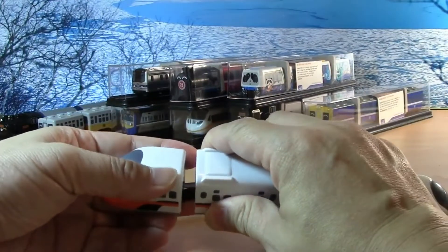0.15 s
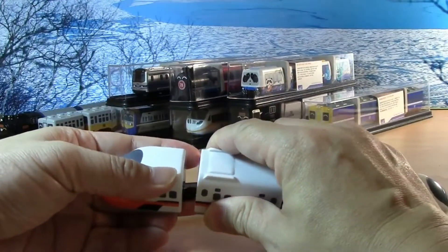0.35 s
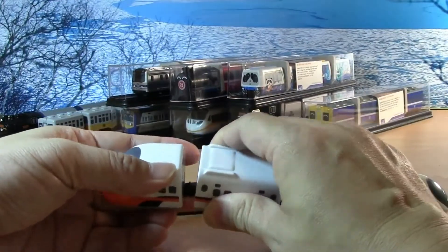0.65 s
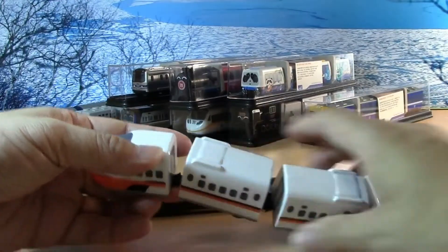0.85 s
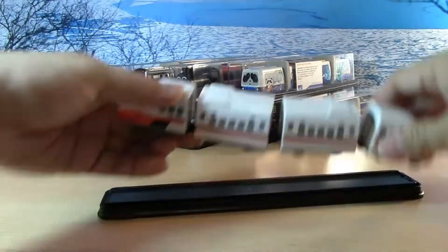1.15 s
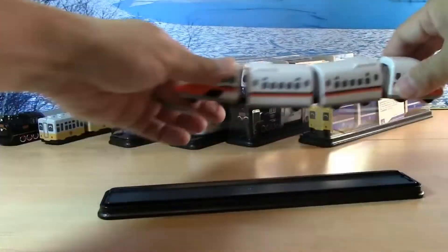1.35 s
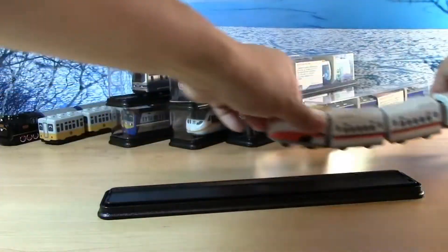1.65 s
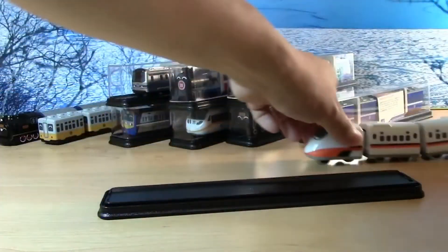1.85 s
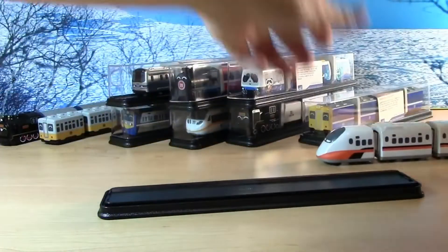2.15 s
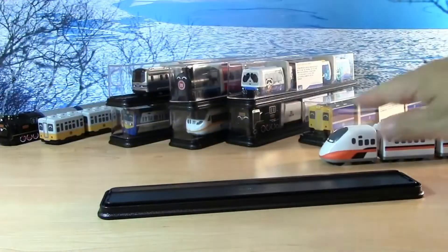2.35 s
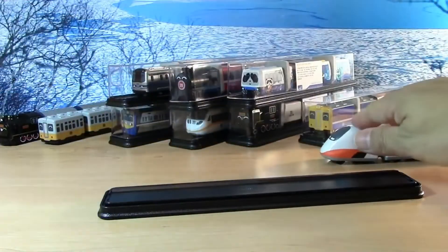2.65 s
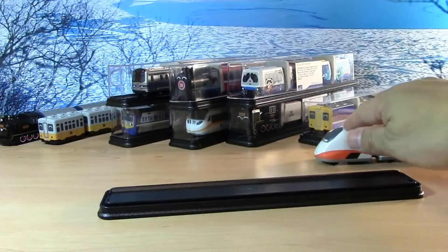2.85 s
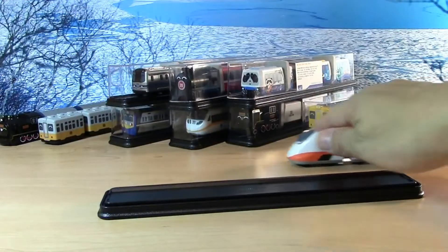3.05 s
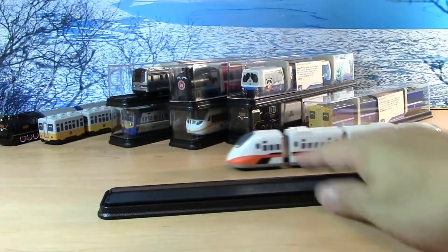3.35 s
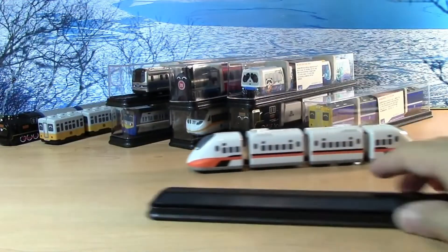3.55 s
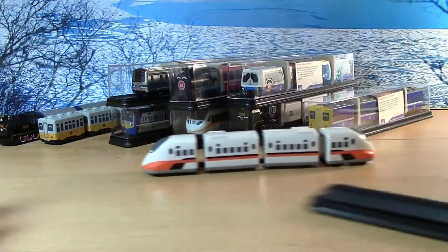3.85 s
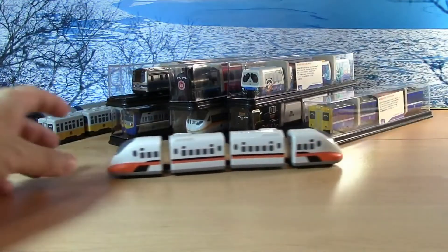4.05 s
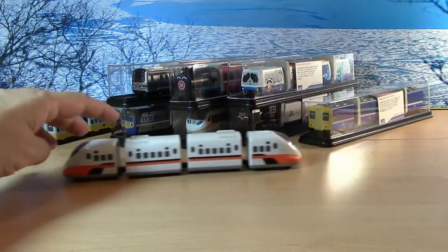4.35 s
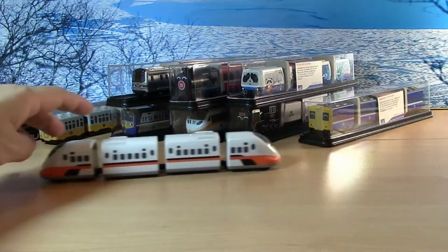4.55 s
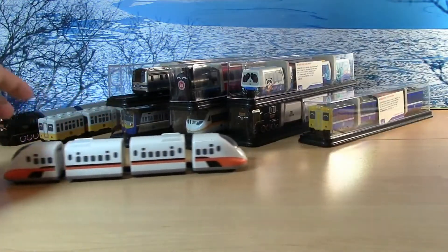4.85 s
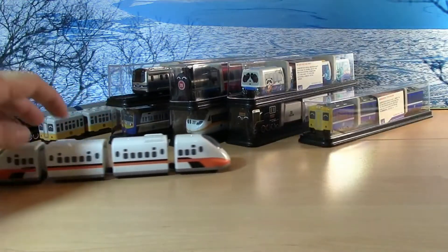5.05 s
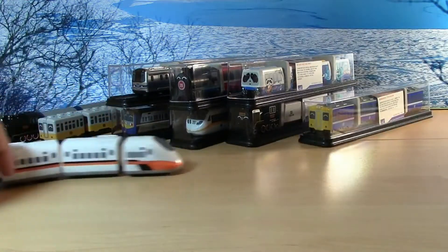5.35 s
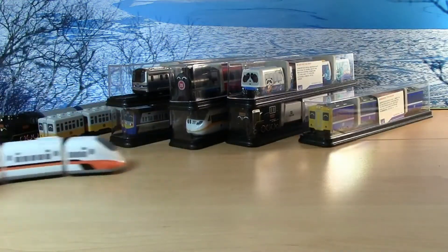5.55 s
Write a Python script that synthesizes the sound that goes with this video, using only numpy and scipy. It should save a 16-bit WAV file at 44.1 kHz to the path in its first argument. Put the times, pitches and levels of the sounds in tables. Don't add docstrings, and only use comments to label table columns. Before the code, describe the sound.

A wind-up toy's slipping gears rattle fast and sharp through a hollow plastic shell for about two seconds. The rattle gives way to wheels and a plastic tray rubbing and knocking on a wooden tabletop, loudest near three seconds. Irregular clacks and short scrapes thin out, ending in a soft rub and room hush. Dry, near microphones, narrow stereo.

```python
import sys
import numpy as np
from scipy import signal
from scipy.io import wavfile
from scipy.ndimage import uniform_filter1d, map_coordinates

SR = 44100
rng = np.random.default_rng(int(sys.argv[2]) if len(sys.argv) > 2 else 0)


def transcribe(u):
    v = np.clip(np.atleast_2d(u).T, -1, 1)
    q = np.round(v * 32767).astype(np.int16)
    wavfile.write(sys.argv[1], SR, q)


def voltage_ratio(decibels):
    exponent = np.asarray(decibels, float) / 20
    return 10 ** exponent


N = 250929


def evened(x):
    return x / np.sqrt(np.mean(x ** 2) + 1e-20)


def read(points, hz):
    f, value = np.transpose(points)
    return np.interp(np.log(hz + 1), np.log(f + 1), value)


def level_curve(points):
    s, db = np.transpose(points)
    return np.interp(np.arange(N) / SR, s, db, left=-120, right=-120)


def causal(db):
    mirrored_db = np.r_[db, db[-2:0:-1]]
    log_gain = np.log(voltage_ratio(np.maximum(mirrored_db, -100)))
    spectrum = np.exp(np.conj(signal.hilbert(log_gain)))
    return np.fft.ifft(spectrum).real[:len(db) - 1]


def hertz():
    return np.linspace(0, SR / 2, 2049)


def peaks(modes, hz):
    f, width, _ = np.transpose(modes)[:, :, None]
    return 1 / (1 + (2 * (hz - f) / width) ** 2)


def summed_db(modes, steep):
    mode_power = voltage_ratio(2 * np.transpose(modes)[2])[:, None]
    power = (mode_power * peaks(modes, hertz()) ** steep).sum(0)
    bass_loss = 1 + (380 / (hertz() + 1)) ** 4
    return 10 * np.log10(power / bass_loss + 1e-9)


def ticks(per_s, spread_db):
    size_db = spread_db * np.minimum(rng.exponential(1, N), 3.6)
    size = voltage_ratio(size_db) * rng.choice([-1., 1.], N)
    return size * (rng.random(N) < per_s / SR)


def lumps(hz, depth_db):
    smooth = signal.lfilter(*signal.butter(2, hz / SR * 2), rng.standard_normal(N))
    return evened(voltage_ratio(depth_db * evened(smooth)))


def rub(level_db, colour_db, per_s, spread_db, lump_hz, lump_db):
    drive = ticks(per_s, spread_db) * lumps(lump_hz, lump_db)
    return voltage_ratio(level_db) * evened(signal.oaconvolve(drive, causal(colour_db))[:N])


def add(mix, s, sound):
    part = mix[round(s * SR):][:len(sound)]
    part += sound[:len(part)]


def strike(out, s, db, t60, rise_s, colour_db, noise):
    t = np.arange(len(noise)) / SR
    decay = voltage_ratio(-60 * t / max(t60, .003))
    burst = noise * abs(noise) * decay * np.minimum(t / rise_s, 1)
    sound = signal.fftconvolve(burst, causal(colour_db))
    add(out, s, voltage_ratio(db) * sound / abs(sound).max())


def wander(x, depth_db, wide_hz, long_s, climb_hz):
    hz, t, z = signal.stft(x, SR, nperseg=512, noverlap=384)
    field = rng.standard_normal((2 * len(hz), len(t)))
    for _ in range(2):
        field = uniform_filter1d(field, max(round(wide_hz / hz[1]), 1), axis=0)
        field = uniform_filter1d(field, max(round(long_s / t[1]), 1), axis=1)
    row = (np.arange(len(hz))[:, None] - climb_hz * t / hz[1]) % (len(field) - 1)
    patches = map_coordinates(evened(field), [row, np.arange(len(t)) + 0 * row], order=1)
    gain_db = depth_db * (patches - uniform_filter1d(patches, 24, axis=0))
    return signal.istft(z * voltage_ratio(gain_db), SR, nperseg=512, noverlap=384)[1][:N]


# time in seconds, rattle level in dB.
GEAR_LEVEL = [(0.0, -31), (0.122, -35.5), (0.2, -75), (0.262, -94), (0.36, -51), (0.42, -28.5),
              (0.5, -22.5), (0.9, -21.5), (1.88, -27), (2.092, -27.5), (2.378, -25.5), (2.4, -32)]
# frequency in Hz, level in dB.
GEAR_COLOUR = [(290, -44.5), (500, -20), (761, 0), (1160, -1), (1300, 5), (1870, -6), (2730, 2),
               (4090, -6.5), (5240, -4), (9490, -19.5), (16000, -38.5)]
# frequency in Hz, width in Hz, lift in dB.
SHELL_MODES = [(743, 120, 2.5), (1240, 670, -0.5), (1330, 320, 1.5), (2660, 250, 0.2), (3100, 1350, 4.5),
               (4590, 200, 9), (5050, 100, 4.5), (5320, 420, 5), (6210, 98, 9), (6840, 170, 9),
               (7610, 620, 10.5), (9340, 780, 10), (11300, 550, 6)]
# frequency in Hz, level in dB.
HUM_COLOUR = [(35, -35), (60, -34), (102, -20.5), (156, -17), (270, -1), (432, 2), (472, 0.5), (650, 2.5),
              (840, 0.5), (1430, -120)]
# time in seconds, level in dB.
TOOTH_SLIPS = [(0.4155, -17), (0.4479, -4.5), (0.5244, -18), (0.5434, -24), (0.5874, -14), (0.5972, -13),
               (0.663, -7), (0.6867, -8), (0.6914, -0.5), (0.717, -6), (0.7802, -7.5), (0.8047, -11),
               (0.8158, -2), (0.9118, -2.5), (0.9298, -9), (0.9418, 0), (0.9544, -4), (0.9634, -1),
               (0.9952, -4.5), (1.0231, -8.5), (1.073, -9), (1.13, -8), (1.2212, -27), (1.2494, -11),
               (1.3836, -7), (1.4316, -4.5), (1.4644, -14), (1.5714, -4.5), (1.7095, -10), (1.7714, -9),
               (1.8937, -11), (1.914, -8), (1.9538, -10)]


def gears(spot_count=8):
    t = np.arange(N) / SR
    level_db = level_curve(GEAR_LEVEL)
    variation_db = 1.83 * rng.standard_normal((spot_count, len(SHELL_MODES)))
    lifts_db = np.transpose(SHELL_MODES)[2] + variation_db
    shell_shapes = peaks(SHELL_MODES, hertz())
    spots = [causal(read(GEAR_COLOUR, hertz()) + db @ shell_shapes) for db in lifts_db]
    impacts = sum(signal.oaconvolve(ticks(750, 2.8), spot)[:N] for spot in spots)
    rattle = evened(impacts * lumps(93, 1.76))

    turns_per_s, slowing, wobble_depth_db = 8.05, 1.977, 0.5
    since = np.clip(t - 0.685, -1, 1.5)
    wobble_db = wobble_depth_db * np.cos(2 * np.pi * (turns_per_s - slowing * since) * since)
    out = voltage_ratio(level_db + 0.38 + wobble_db) * rattle

    slip_decay = voltage_ratio(-60 * np.arange(400) / SR / 0.016)
    spot_index = rng.integers(0, spot_count, len(TOOTH_SLIPS))
    chatter = rng.standard_normal((len(TOOTH_SLIPS), 400))
    for (s, db), k, noise in zip(TOOTH_SLIPS, spot_index, chatter):
        slip = np.convolve(noise * abs(noise) * slip_decay, spots[k])
        add(out, s, voltage_ratio(db - 4.0) * slip / abs(slip).max())
    return wander(out, 2.22, 300, 0.029, 112) + chassis_hum(level_db)


def chassis_hum(gear_db):
    set_down_s, damp_db_per_s = 2.19, 28
    on_table_s = np.maximum(np.arange(N) / SR - set_down_s, 0)
    hum_db = -28.5 + 0.36 * gear_db - damp_db_per_s * on_table_s
    return rub(hum_db, read(HUM_COLOUR, hertz()), 3000, 0.93, 28, 0.59)


# start in seconds, end in seconds,
# first level in dB, last level in dB, plastic rasp in dB relative to the stroke.
STROKES = [(1.978, 2.62, -21.5, -36, -12), (2.233, 2.65, -43.5, -36, 16), (2.66, 2.782, -34, -37, 12.5),
           (2.686, 2.834, -26.5, -22, -4), (2.837, 2.969, -16.5, -29, -5),
           (2.991, 3.14, -20.5, -22.5, -2.5), (3.23, 3.233, -15, -20.5, -3), (3.306, 3.5, -41.5, -43, -4),
           (3.52, 3.587, -32.5, -29.5, -4), (3.629, 3.796, -29, -61, 1.5), (3.833, 3.894, -39, -43, -8),
           (3.933, 4.053, -34.5, -21, -10.5), (4.14, 4.232, -27.5, -32, -11),
           (4.276, 4.389, -25.5, -23, -7), (4.41, 4.553, -22.5, -29.5, -6.5), (4.557, 4.735, -30, -48, -7),
           (4.753, 4.894, -47.5, -49, -1)]


def pressure():
    attack_db_per_s, release_db_per_s = 500, 249
    t, power = np.arange(N) / SR, np.zeros((3, N))
    for start, end, first_db, last_db, rasp_db in STROKES:
        db = np.interp(t, [start, end], [first_db, last_db])
        db = db - attack_db_per_s * np.maximum(start - t, 0)
        db = db - release_db_per_s * np.maximum(t - end, 0)
        hiss_db = -4.5 + (1 + 0.16) * rasp_db
        power += voltage_ratio(2 * (db + np.array([[0], [rasp_db], [hiss_db]])))
    return 10 * np.log10(power + 1e-12)


# frequency in Hz, width in Hz, level in dB.
TABLE_MODES = [(630, 35, -10), (769, 106, -3.5), (952, 347, -3.5), (1177, 200, -1.5), (1330, 330, -4.5),
               (1527, 400, -3.5), (1810, 140, -13.5)]
# frequency in Hz, width in Hz, level in dB.
CAR_MODES = [(2210, 850, -6.5), (2800, 180, -3.5), (3130, 890, -7), (3520, 400, -4), (4200, 570, -16.5)]
# frequency in Hz, level in dB.
HISS_COLOUR = [(2350, -40), (3300, -3), (4000, 1.5), (5070, 16.5), (6700, 10), (8210, 8.5), (8550, 6.5),
               (10100, 1), (15500, -18.5), (16000, -70)]


def drag():
    table_db, car_db, hiss_db = pressure()
    drone = rub(table_db - 4.0, summed_db(TABLE_MODES, 1.43), 1600, 0.25, 73, 1.06)
    rasp = rub(car_db - 4.5, summed_db(CAR_MODES, 1.52), 2500, 1.1, 44, 0.23)
    hiss = rub(hiss_db - 4.0, read(HISS_COLOUR, hertz()), 9000, 0.82, 99, 2.5)
    return wander(drone, 1.5, 200, .04, 0) + wander(rasp + hiss, 2.2, 400, .04, 300)


# start in seconds,
# end in seconds, first frequency in Hz, last frequency in Hz, level in dB.
SWEEPS = [(2.2, 2.34, 9150, 9300, -36), (2.36, 2.5, 9500, 7200, -36), (2.44, 2.8, 9700, 10400, -38),
          (2.19, 2.53, 1800, 7000, -42), (2.3, 2.46, 6800, 14000, -40), (2.4, 2.56, 5900, 6600, -29),
          (2.5, 2.76, 6900, 7500, -33), (2.48, 2.76, 8700, 7400, -47), (2.28, 2.41, 3400, 3400, -44),
          (2.43, 2.62, 2600, 5100, -37), (2.58, 2.78, 3300, 3150, -27.5), (2.44, 2.64, 2600, 2200, -32.5),
          (2.55, 2.78, 1800, 3100, -29.5), (2.22, 2.36, 1300, 2200, -30.5), (2.43, 2.78, 1480, 1500, -34.5),
          (2.58, 2.78, 4400, 6900, -46), (2.84, 2.9, 2600, 3500, -25), (3.02, 3.1, 4300, 6900, -28),
          (3.0, 3.17, 4600, 1900, -30), (3.085, 3.125, 3500, 2300, -33), (0.28, 0.69, 3100, 1600, -44.5),
          (2.33, 2.39, 1850, 1600, -23.5), (2.56, 2.8, 2500, 2600, -31.5), (2.04, 2.13, 1800, 2400, -31.5),
          (3.63, 3.78, 2780, 2850, -42)]


def sweeps():
    out = np.zeros(N)
    noises = rng.standard_normal((len(SWEEPS), 2, 20000))
    for (start, end, first_hz, last_hz, db), (a, b) in zip(SWEEPS, noises):
        size = round((end - start) * SR)
        width_hz = .11 * first_hz
        slow = signal.lfilter(*signal.butter(2, width_hz / SR), a + 1j * b)[1000:1000 + size]
        turns = np.cumsum(np.linspace(first_hz, last_hz, size)) / SR
        tone = (slow * np.exp(2j * np.pi * turns)).real
        add(out, start, voltage_ratio(db) * evened(tone) * signal.windows.tukey(size, .6))
    return out * lumps(75, 1.3)


# time in seconds, level in dB, body ring in dB relative
# to the crack, body ring in Hz, top treble in dB relative to the crack.
KNOCKS = [(2.0018, -27, 17, 2620, -24), (2.0384, -26, 11.5, 2310, -20), (2.0986, -15.5, 1, 2900, -22),
          (2.12, -18, 8, 3000, -30), (2.338, -22, 9, 2700, -33), (2.355, -22, 9, 1870, -30),
          (2.1735, -14, -13, 2870, -31), (2.816, 2, -6, 2930, -14), (3.0165, -6.5, 2, 2800, -25),
          (3.1033, -10, -7, 2830, -30), (3.1333, -15, -3, 3460, -36), (3.2206, -3, -2, 2300, -34),
          (3.2374, -11, 1, 2600, -27), (3.5104, -9.5, 0, 3340, -27), (3.5778, -8.5, 0, 2830, -23),
          (3.5924, -10, -5, 2740, -24), (3.6152, -13, 2, 2620, -8), (3.8237, -32.5, 6, 2250, -24),
          (3.932, -13.5, -2.5, 3570, -43), (4.0337, -15, 3.5, 3080, -22), (4.146, -18, 8.5, 2150, -24),
          (4.5261, -8, -3, 2800, -32), (4.5304, -10.5, 3.5, 3100, -32), (4.8065, -42, 17.5, 2380, -20),
          (4.8304, -41, 8, 2300, -23)]
# time in seconds, level in dB.
MORE_KNOCKS = [(3.1975, -20), (3.2914, -35), (3.5248, -19.5), (3.726, -33.5), (3.758, -36), (3.77, -34),
               (3.848, -25.5), (3.9524, -22), (3.967, -24), (4.008, -32), (4.0242, -19.5), (4.0408, -23),
               (4.078, -24), (4.139, -19), (4.1605, -23), (4.1809, -37), (4.19, -31), (4.226, -31), (4.502, -29),
               (4.549, -20), (4.748, -31), (4.7592, -32), (5.4321, -50), (5.5567, -39.5), (5.5804, -35.5),
               (5.6456, -46)]


def knocks():
    t60 = 0.025
    shared_ring_db, shared_ring_hz, shared_treble_db = 1, 2900, -23.5
    rows = KNOCKS + [(s, db, shared_ring_db, shared_ring_hz, shared_treble_db) for s, db in MORE_KNOCKS]
    out, chatter = np.zeros(N), rng.standard_normal((len(rows), 2, 1600))
    spot_hz = rng.uniform(2000, 9140, len(rows))
    softer_body = [(f, w, d - 7) for f, w, d in CAR_MODES]
    for (s, db, ring_db, hz, top_db), (a, b), spot in zip(rows, chatter, spot_hz):
        tilt_db = (top_db + 23.5) * np.clip((hertz() - 6500) / 4000, 0, 1)
        spot_db = 6.0 * peaks([(spot, 700, 0)], hertz())[0]
        bright_db = read(HISS_COLOUR, hertz()) + tilt_db + spot_db
        body_db = summed_db([(hz, 350, 0)] + softer_body, 1.19)
        strike(out, s, db - 3.5, t60, 0.00015, bright_db, a)
        strike(out, s, db + ring_db - 0.4, t60, 0.0011, body_db, b)
    return out


# time in seconds, level in dB, main ring in Hz.
LANDINGS = [(1.989, -14, 1170), (2.002, -11.5, 1500), (2.039, -13, 645), (2.096, -9, 1210),
            (2.818, -2, 1330), (2.989, -17, 1450), (3.015, -6, 1200), (3.102, -13, 1370),
            (3.134, -13.5, 1120), (3.199, -19, 1430), (3.222, 2, 1200), (3.241, -6.5, 1010),
            (3.346, -23, 1570), (3.517, -14.5, 1360), (3.536, -20, 1450), (3.578, -8.5, 1770),
            (3.592, -9, 1150), (3.606, -15.5, 940), (3.826, -20, 1140), (3.921, -18, 1150),
            (3.936, -16, 1470), (3.988, -15, 870), (4.026, -25, 1510), (4.05, -4.5, 1230),
            (4.07, -13.5, 1090), (4.082, -18, 990), (4.097, -28, 1200), (4.134, -11, 1330),
            (4.16, -12.5, 900), (4.211, -20.5, 1100), (4.261, -18.5, 890), (4.536, -5, 1420),
            (4.666, -23.5, 860), (4.747, -18.5, 800), (4.806, -20.5, 790), (4.83, -21, 1390)]
# time in seconds, level in dB.
LEG_BUMPS = [(0.588, -49), (0.686, -52), (0.944, -47.5), (1.084, -51), (2.032, -48), (2.839, -54),
             (3.232, -48), (3.449, -61), (3.993, -56), (4.149, -55), (5.3, -55)]


def thuds():
    out, t = np.zeros(N), np.arange(8192) / SR
    chatter = rng.standard_normal((len(LANDINGS), 2000))
    for (s, db, hz), noise in zip(LANDINGS, chatter):
        cycles = 22.3 - 1.1 * db
        top_db = summed_db([(hz, 240, 4.0)] + TABLE_MODES, 3.06)
        strike(out, s, db - 3.5, cycles / hz, 0.00087, top_db, noise)
    leg_hz, leg_t60, leg_rise_s = 102, 0.18, 0.017
    for s, db in LEG_BUMPS:
        swing = np.sin(2 * np.pi * leg_hz * t) * np.minimum(t / leg_rise_s, 1)
        add(out, s, voltage_ratio(db - 60 * t / leg_t60) * swing)
    return out


# time in seconds, peak level in dB.
BOUNCES = [(3.5985, -9), (3.605, -15), (3.6145, -6.5), (3.6225, -10), (3.629, -15), (3.636, -10.5),
           (3.646, -17), (3.6525, -10.5), (3.661, -17), (3.667, -20), (3.674, -19), (3.685, -26),
           (3.6925, -20.5), (3.705, -28), (3.715, -29), (3.7589, -36), (3.847, -30)]
# frequency in Hz, level in dB, t60 in seconds.
RING_MODES = [(2745, 4, .045), (2805, 1, .05), (2850, -2, .04), (2925, -4, .03), (2670, -6, .03),
              (4600, -10, .04), (4930, -10, .05), (5450, -12, .025), (1325, -5, .035), (1145, -9, .025)]


def bounces():
    out, t = np.zeros(N), np.arange(8192) / SR
    hz, mode_db, t60 = np.transpose(RING_MODES)[:, :, None]
    phase = rng.random((len(BOUNCES), len(RING_MODES), 1))
    for (s, db), turn in zip(BOUNCES, phase):
        modes = voltage_ratio(mode_db - 60 * t / t60) * np.sin(2 * np.pi * (hz * t + 0.2 * turn))
        ring = modes.sum(0) * np.minimum(t / 0.002, 1) ** 2
        add(out, s, voltage_ratio(db) * ring / abs(ring).max())
    return out


# start in seconds, end in seconds, frequency in Hz, width in Hz, level in dB.
SQUEAKS = [
    (0, .16, 880, 500, -38),
    (.26, .43, 1150, 500, -50),
    (.245, .28, 2600, 300, -60),
    (2.07, 2.14, 3000, 900, -29),
    (2.62, 2.8, 1130, 150, -33),
    (2.35, 2.8, 660, 50, -43),
    (5.1, 5.31, 2700, 1500, -47),
    (3.31, 3.48, 2350, 280, -47),
    (3.6, 3.76, 1400, 220, -38),
    (3.59, 3.67, 10900, 600, -49),
]


def squeaks():
    out = np.zeros(N)
    noises = rng.standard_normal((len(SQUEAKS), 20000))
    for (start, end, hz, width, db), noise in zip(SQUEAKS, noises):
        size = round((end - start) * SR)
        resonance = causal(summed_db([(hz, width, 0)], 2))
        tone = signal.fftconvolve(noise, resonance)[1000:1000 + size]
        add(out, max(start, 0), voltage_ratio(db) * evened(tone) * signal.windows.tukey(len(tone), .6))
    return out


# time in seconds, level in dB.
SLIDE_LEVEL = [
    (4.82, -56),
    (4.948, -43),
    (5.268, -41.5),
    (5.294, -48.5),
    (5.318, -63),
    (5.69, -58.5),
]
# frequency in Hz, level in dB.
SLIDE_COLOUR = [(590, -50), (1000, -11), (1340, -1.5), (1630, -7), (1910, -3), (2100, -7), (3270, -0.5),
                (4170, -7.5), (7190, -4), (9490, -9), (16000, -23)]


def slide():
    rubbing = rub(level_curve(SLIDE_LEVEL), read(SLIDE_COLOUR, hertz()), 9000, 1.0, 40, 0.93)
    return wander(rubbing, 2.3, 270, 0.035, 356)


# frequency in Hz, t60 in seconds.
ROOM_DECAY = [(300, 0.16), (1500, 0.081), (5000, 0.048), (12000, 0.022)]


def tail(start_s):
    taps = np.zeros(SR // 5)
    at = np.arange(round(start_s * SR), len(taps) - 20, 20)
    taps[at + rng.integers(0, 20, len(at))] = rng.choice([-1., 1.], len(at))
    hz, t, z = signal.stft(taps, SR, nperseg=256)
    decay = voltage_ratio(-60 * t / read(ROOM_DECAY, hz)[:, None])
    out = signal.istft(z * decay, SR, nperseg=256)[1]
    return out / np.linalg.norm(out)


# frequency in Hz, level in dB.
HUSH_COLOUR = [(15, -56), (25, -31), (80, -14.5), (309, 3.5), (818, -2.5), (1020, -1.5), (1370, -6.5),
               (2550, -12), (2910, -13.5), (4250, -16), (5430, -15), (13600, -39), (16000, -42)]


def hush():
    return rub(-51, read(HUSH_COLOUR, hertz()), 30000, 0.95, 1.7, 0.69)


# frequency in Hz, side minus mid in dB.
STEREO_WIDTH = [(60, -23), (290, -46), (640, -44), (1400, -34), (3100, -26), (6000, -20), (9000, -18.5),
                (15000, -18)]


def scene():
    toy = gears() + drag() + knocks() + thuds() + bounces() + squeaks() + sweeps() + slide()
    mid = toy + voltage_ratio(-15.5) * signal.oaconvolve(toy, tail(.004))[:N]
    side_filter = np.convolve(causal(read(STEREO_WIDTH, hertz())), tail(0.00043)[:900])
    side = signal.oaconvolve(mid, side_filter)[:N]
    side = voltage_ratio(4.0) * wander(side, 3.9, 900, 0.057, 130)
    side = side + voltage_ratio(-11.0) * hush() + voltage_ratio(-20.0) * slide()
    mid = mid + hush()
    return np.array([mid + side, mid - side])


# frequency in Hz, level in dB relative to mid.
SIDE_MASK = [(500, -32), (1200, -24.5), (4000, -20.5), (8000, -13.5), (15000, -15.5)]


def masking(x):
    hz, t, z = signal.stft([x[0] + x[1], x[0] - x[1]], SR, nperseg=2048, noverlap=1024)
    band = (5.5 * np.log(1 + hz / 1500)).astype(int) * 100 + (hz // 640).astype(int)
    starts = np.flatnonzero(np.diff(band, prepend=-1))
    power = np.add.reduceat(abs(z) ** 2, starts, axis=1)
    whole = power[0].sum(0)
    treble = power[0, hz[starts] > 6000].sum(0)
    sudden = (treble > 4.0 * np.roll(treble, 1)) | (rng.random(len(t)) < .07)
    quiet = whole < voltage_ratio(2 * -37)
    audible = power[0] > whole * voltage_ratio(2 * -53)
    mid_kept = audible | (hz[starts] < 12500)[:, None] | quiet
    side_kept = power[1] > power[0] * voltage_ratio(2 * read(SIDE_MASK, hz[starts]))[:, None]
    kept = np.array([mid_kept, side_kept & mid_kept]) | sudden
    z *= np.repeat(kept, np.diff(starts, append=len(hz)), axis=1)
    mid, side = signal.istft(z, SR, nperseg=2048, noverlap=1024)[1][:, :N] / 2
    return np.array([mid + side, mid - side])


def top_cut(x):
    return signal.sosfilt(signal.butter(12, 16660, fs=SR, output="sos"), x)


# frequency in Hz, gain in dB.
MIC_RESPONSE = [(22, 11), (45, 13), (150, 6.5), (400, 1.5), (15700, 0), (16100, -18), (16700, -58)]


def record(dry):
    heard = signal.oaconvolve(dry, causal(read(MIC_RESPONSE, hertz()))[None], axes=1)[:, :N]
    overloaded = 1.84 * np.tanh(heard / 1.946)
    mix = masking(overloaded)
    return top_cut(mix)


dry = scene()
out = record(dry)
transcribe(out)
```